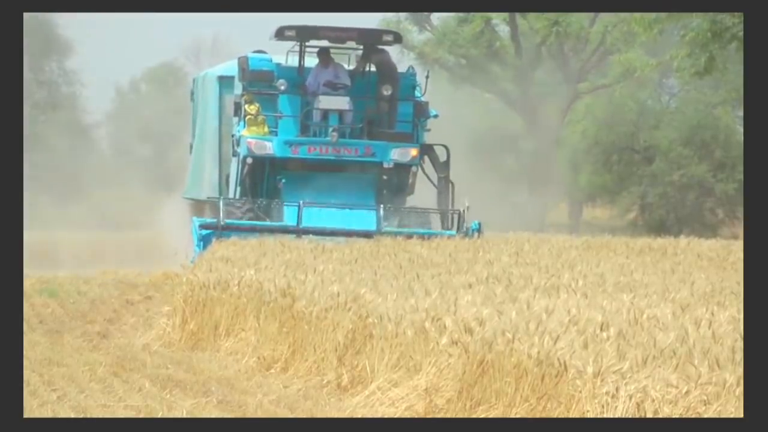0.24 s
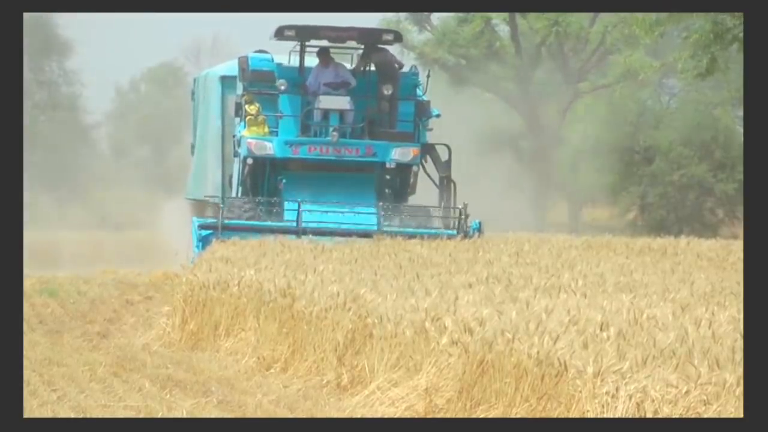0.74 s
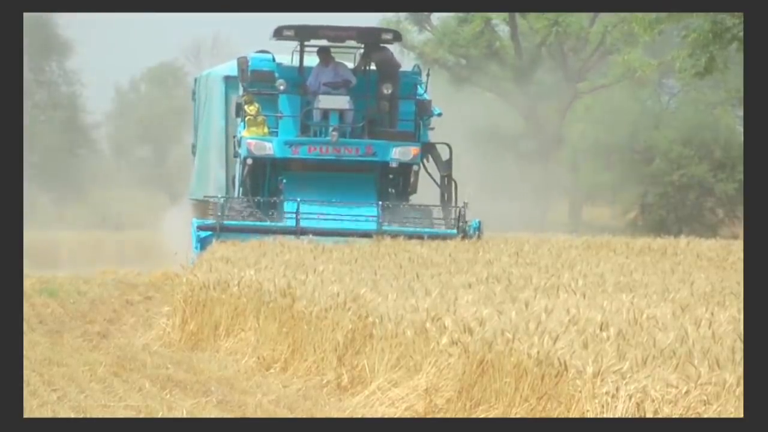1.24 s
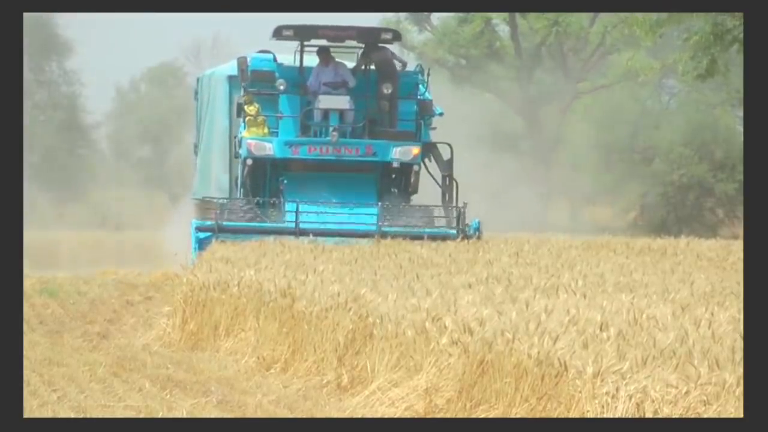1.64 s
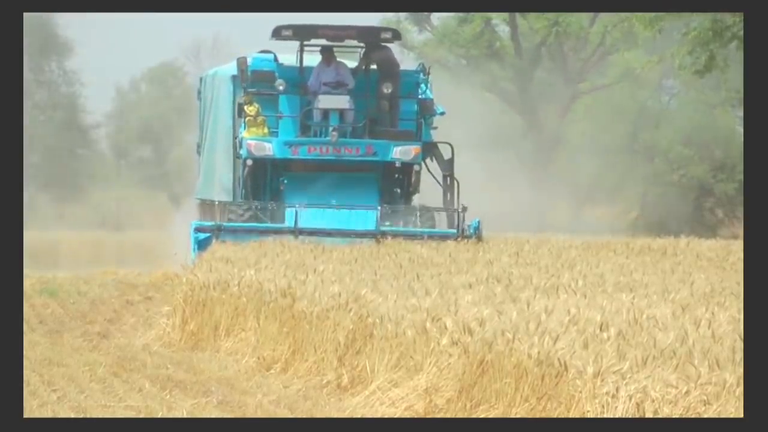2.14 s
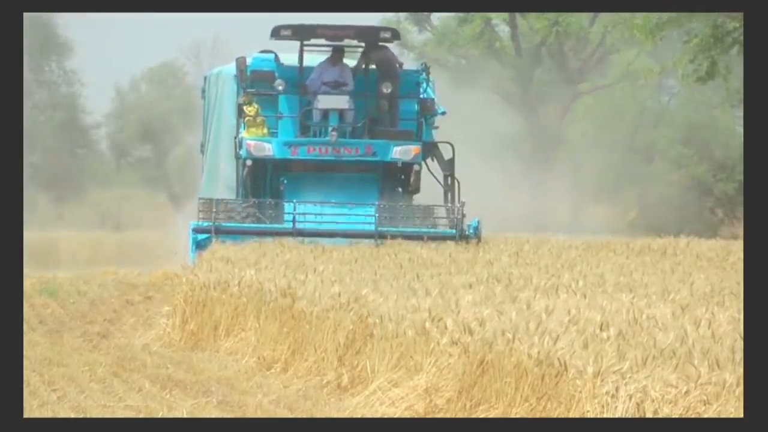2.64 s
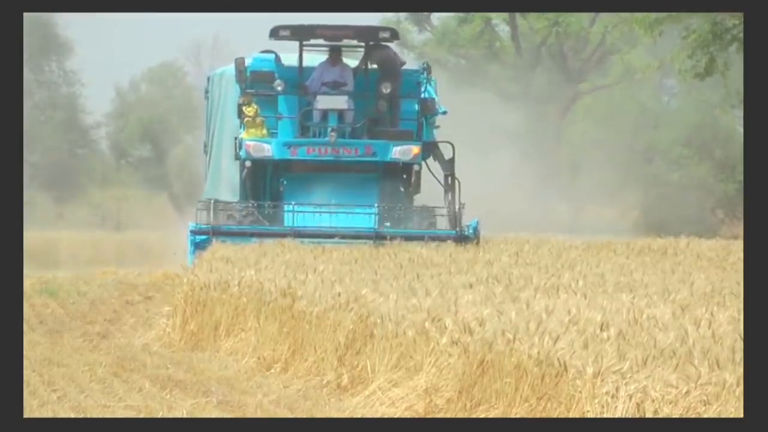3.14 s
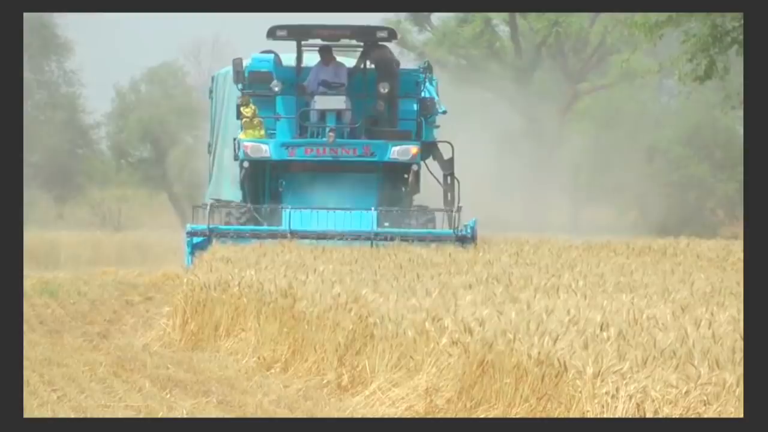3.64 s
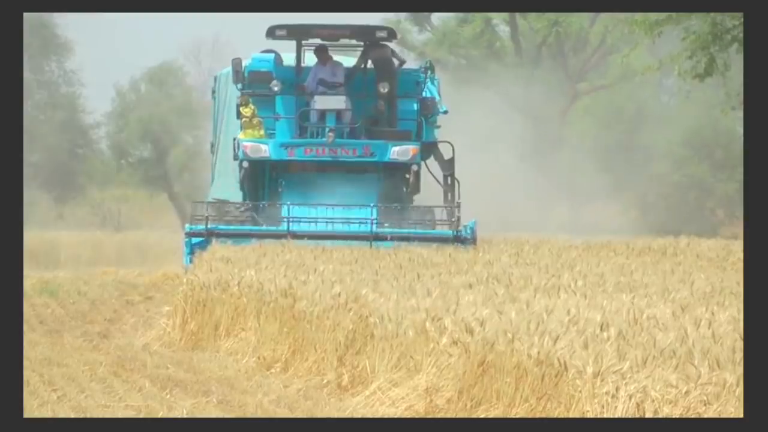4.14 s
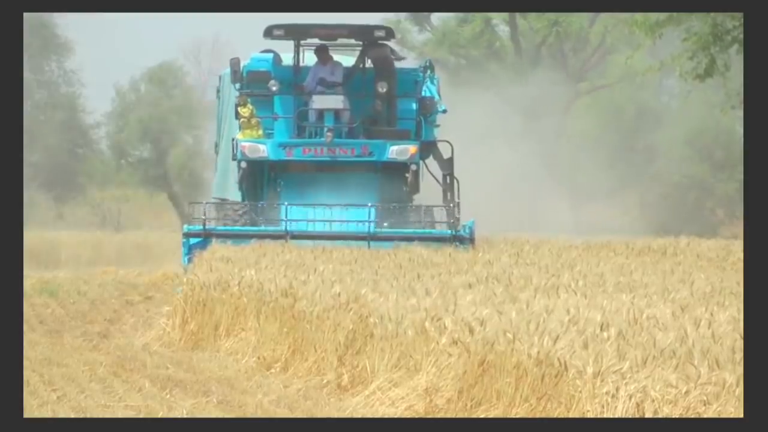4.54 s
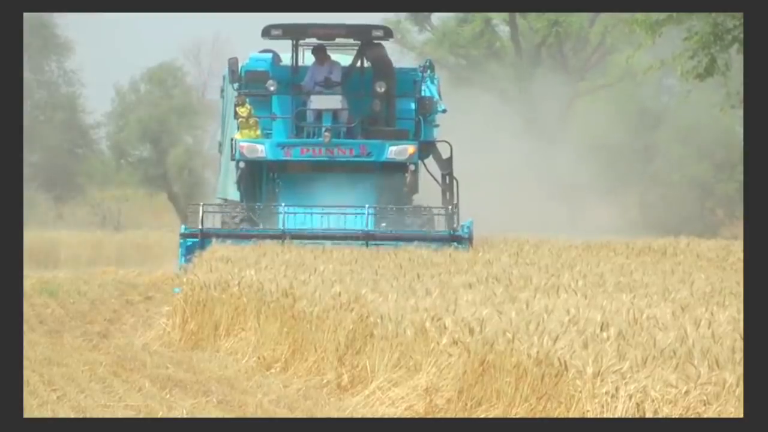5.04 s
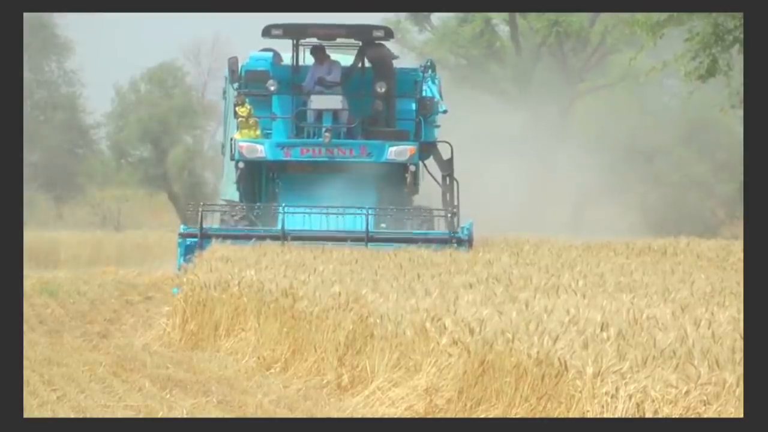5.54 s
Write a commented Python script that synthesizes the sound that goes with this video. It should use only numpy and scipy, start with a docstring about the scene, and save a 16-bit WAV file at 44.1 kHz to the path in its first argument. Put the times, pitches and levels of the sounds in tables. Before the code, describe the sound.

A combine harvester works some way off in an open field. A steady low diesel hum, booming sheet-metal panels and a grainy rush of threshing run throughout, the rush rising slightly. Over them the knife clatters at about 22 strokes a second, hard, ringing and metallic, skewed to the right, with brighter straw-shearing swells. It peaks in sharp clacks around 2.0 to 2.3 s, then falls away by 2.6 s, creeping back from about 3 s as fainter, irregular knocks. Tiny scratchy squeaks come near 2.7, 3.9 and 4.2 s. Wind thumps the microphone with dull, bassy bursts from 0.4 to 1.1 s, eases, returns from 3.4 s and pounds hardest after 4.4 s, with a violent burst near 4.5 s and another at 5.7 s; strong gusts briefly duck all the sound. A fine, wide, dry crop hiss grows toward the end at 5.8 s.

```python
"""A combine harvester cuts wheat some way off in an open field, its rush of threshing noise rising as it nears.
The knife, bursts of noise ringing bar resonances, clatters hard for two seconds, drops away, then creeps back.
Under it run the diesel's sine harmonics, booming panels and grainy threshing noise; from 2.7 s scratchy tones
squeak now and then. Wind, rumbling noise, buffets the microphone in the first second, eases, then returns
from 3.4 s, hardest after 4.4 s, while the high noise of the crop's hiss grows and strong gusts duck the level."""
import sys
import numpy as np
from scipy import signal
from scipy.fft import rfft, irfft
from scipy.io import wavfile
from scipy.ndimage import uniform_filter1d

SR = 44100
rng = np.random.default_rng(int(sys.argv[2]) if len(sys.argv) > 2 else 0)


def wav_record(signal):
    """Record a signal, one row per channel, as 16-bit PCM in the file named by sys.argv[1]."""
    frames = np.transpose(np.atleast_2d(signal))
    bounded = np.clip(frames, -1, 1)
    # unit amplitude maps onto the largest positive 16-bit level
    quanta = np.round(bounded * 32767).astype(np.int16)
    wavfile.write(sys.argv[1], SR, quanta)


N = 255339
TIME = np.arange(N) / SR
FREQS = np.fft.rfftfreq(N, 1 / SR)


def amp(db):
    """Decibels to gain."""
    return 10 ** (np.asarray(db) / 20)


def unit(x):
    """Scales to rms 1."""
    return x / np.sqrt(np.mean(x ** 2) + 1e-20)


def curve(rows, t=TIME):
    """Reads a table over time."""
    return np.interp(t, *np.transpose(rows))


def spectrum(rows, hz=FREQS):
    """Reads a table over log frequency."""
    f, value = np.transpose(rows)
    return np.interp(np.log(hz + 1), np.log(f + 1), value)


def colour(x, response):
    """Filters by a frequency response."""
    return irfft(rfft(x) * response, x.shape[-1])


def pan(db):
    """Left and right gains for a level difference."""
    return amp(np.array([db, -db]) / 2)


def drift(rate_hz):
    """Slow chance of rms 1: random points, two per cycle of the rate, joined by straight lines."""
    steps = TIME * rate_hz * 2
    return unit(np.interp(steps, np.arange(N), rng.standard_normal(N)))


def swell(t, half):
    """A smooth rise and fall of height 1 around t = 0."""
    return np.exp(-(t / half) ** 2 / 2)


def power(x, span):
    """Running power of both ears over about span seconds."""
    size = max(int(span * SR), 2)
    smoothed = uniform_filter1d(uniform_filter1d((x ** 2).mean(0), size), size)
    return abs(smoothed) + 1e-14


def noise_pair(likeness, size=N):
    """White noise at two ears, alike by the given share at each frequency."""
    a, b = rfft(rng.standard_normal((2, size)))
    same = np.clip(spectrum(likeness, np.fft.rfftfreq(size, 1 / SR)), -1, 1)
    other = same * a + np.sqrt(1 - same ** 2) * b
    return irfft(np.array([a, other]), size)


def add(mix, s, sound):
    """Mixes a sound in, centred on s seconds."""
    start = max(round(s * SR) - sound.shape[1] // 2, 0)
    part = mix[:, start:][:, :sound.shape[1]]
    part += sound[:, :part.shape[1]]


# Stereo widening, which pushes sound to the right and cuts a deep notch in the left ear:
# (frequency [Hz], left-right level [dB], left leads by [radians])
STEREO_WIDENING = [(400, 0, -.1), (900, -2, -.7), (1400, -5, -.7), (1950, -10, -1.05), (2150, -15, -1.2),
                   (2260, -24, -.6), (2350, -16, .6), (2550, -8.5, .45), (2900, -6, 0), (4300, -4.8, -.05),
                   (6000, -.5, 0), (15000, 0, 0)]


def widen(x, share):
    """Widens a sound towards the right by a share of that level and phase; both ears' sum keeps its colour."""
    hz, db, radians = np.transpose(STEREO_WIDENING)
    level = amp(share * spectrum(np.c_[hz, db]))
    ratio = level * np.exp(1j * share * spectrum(np.c_[hz, radians]))
    return colour(x, 2 * np.array([ratio, np.ones_like(ratio)]) / (1 + ratio))


# Knife drive: (time [s], speed [strokes/s])
KNIFE_DRIVE = [(0.0, 22.47), (0.6, 22.73), (1.0, 22.58), (1.5, 23.05), (2.0, 22.72), (2.5, 22.58),
               (3.0, 21.97), (3.4, 21.53), (3.9, 21.81), (4.4, 22.3), (4.7, 22.15), (5.0, 22.43),
               (5.3, 22.37), (5.8, 22.59)]
# Impacts at the two ears: (frequency [Hz], likeness [0-1])
KNIFE_LIKENESS = [(300, 0.6), (1400, 0.9), (2200, 0.95), (2700, 0.98), (6000, 0.98)]
# Ringing of the cutter bar: (frequency [Hz], width [Hz], relative level [dB])
BAR_RESONANCES = [(1136, 54, 0), (1449, 53, 8.5), (1793, 63, 6.5), (2123, 160, 5.5), (2450, 130, 2),
                  (2673, 120, 0.5), (2890, 44, 3), (3160, 106, 3), (3504, 70, -0.5), (3880, 87, -18),
                  (4500, 84, -20)]
# Dull part of each knock: (frequency [Hz], relative density [dB per Hz])
KNOCK_COLOUR = [(200, -20), (500, 2), (900, 6.5), (1200, 0), (1450, 15), (2400, 6.5), (3400, 3.5),
                (3900, -4.5), (4700, -7), (5050, -28), (5800, -18), (9000, -39)]


def knife(level_db=-9.5, lead=0.054, rise=0.0054, attack=0.00064, spread=0.0032, tap=0.39,
          rattle=0.39, rattle_decay=0.024, grain_db=2.2, knock_db=-8.5, hardening=0.59,
          echo=0.58, echo_s=0.00283, shear_db=-8, spot_db=4.0, count=4):
    """Each stroke throws loose sections on their guards: a light tap, then tight impacts that ring the bar."""
    strokes = np.cumsum(curve(KNIFE_DRIVE)) / SR + lead  # lead in strokes
    index = strokes.astype(int)
    starts = TIME[np.searchsorted(index, np.arange(index[-1] + 1))]
    age = TIME - starts[index]  # seconds into the stroke
    late = age - rise  # seconds past the main knock

    # the loose sections rattle on after the knock
    tail = rattle * np.clip(late / rise, 0, 1) * np.exp(-abs(late) / rattle_decay)
    light_tap = tap * swell(age - rise / 2, rise / 4)
    main_knock = swell(late, np.where(late < 0, attack, spread))
    blow = unit(light_tap + main_knock + tail)
    grain = unit(amp(grain_db * drift(585)))
    impacts = noise_pair(KNIFE_LIKENESS) * blow * grain

    modes = np.array([amp(db) / (1 + 2j * (FREQS - hz) / width) for hz, width, db in BAR_RESONANCES])
    modes /= 1 + (FREQS / 5000) ** 10  # the crop and the air take the ring's top off
    modes /= np.sqrt(np.mean(np.sum(abs(modes) ** 2, axis=0)))
    # each stroke lands on another spot of the bar and favours other modes, in count groups
    spots = amp(spot_db * rng.standard_normal((len(starts), count)))
    spots *= rng.choice([-1, 1], (len(starts), count))
    metal = sum(colour(impacts * spots[index, k], modes[k::count].sum(0)) for k in range(count))

    # the further a clack stands above the steady knocking, the more it cracks rather than rings
    steady_db, force_db = stroke_levels(starts + rise)
    crack = amp(knock_db + hardening * (force_db - steady_db))[index]
    # the knock reflects off the sheet metal behind the knife
    hollow = 1 + echo * np.exp(-2j * np.pi * FREQS * echo_s)
    dull_noise = noise_pair(KNIFE_LIKENESS) * unit(blow ** 1.18)
    metal += crack * colour(dull_noise, unit(amp(spectrum(KNOCK_COLOUR))) * hollow)

    # the energy of a stroke's metal is set by its force alone, wherever it lands
    metal_energy = np.bincount(index, (metal ** 2).mean(0))
    blow_energy = np.bincount(index, blow ** 2)
    metal /= np.sqrt(metal_energy / (blow_energy + 1e-9) + 1e-9)[index]
    force = amp(force_db + level_db)[index]
    straw = amp(shear_db) * shearing(impacts, starts[index] + rise)
    return widen(force * metal + straw, 0.92)


# Steady knocking, dying away after two seconds and creeping back, before the knife's overall gain:
# (time [s], level [dB])
STEADY_KNOCKING = [(0, -43.5), (.35, -41), (.5, -43.5), (.65, -40.5), (.8, -43.5), (1.0, -40), (1.3, -38.5),
                   (1.55, -37), (1.88, -42.5), (2.0, -36), (2.1, -57.5), (3.15, -56), (3.4, -50),
                   (3.75, -49.5), (3.93, -45.5), (4.45, -44.5), (4.56, -49), (4.72, -47.5), (5.8, -49.5)]
# Single strokes that clack hard, before the same gain: (time [s], level [dB])
HARD_CLACKS = [(0.095, -39.5), (0.184, -39.5), (0.317, -38.5), (0.493, -40), (0.58, -38), (0.625, -38),
               (1.637, -37), (1.678, -38), (1.81, -38), (1.985, -37), (2.03, -33.5), (2.073, -36),
               (2.252, -43.5), (2.297, -34), (2.34, -32.5), (2.517, -42.5), (2.56, -39), (2.603, -42.5),
               (3.01, -46), (3.055, -46.5), (3.654, -47), (3.7, -46.5), (4.022, -46), (4.34, -42),
               (4.385, -42), (4.474, -45), (4.745, -42.5), (4.88, -47), (4.924, -43), (5.013, -46),
               (5.102, -44), (5.415, -44.5), (5.459, -44.5), (5.55, -46), (5.59, -43.5), (5.635, -46)]


def stroke_levels(times, scatter_db=0.7):
    """Steady and full knock of each stroke in dB: chance scatters them, a clack takes over the nearest stroke."""
    steady_db = curve(STEADY_KNOCKING, times) + scatter_db * rng.standard_normal(len(times))
    knock_db = steady_db.copy()
    for s, db in HARD_CLACKS:
        knock_db[np.argmin(abs(times - s))] = db
    return steady_db, knock_db


# Shearing of straw: (frequency [Hz] at pitch 1, relative density [dB per Hz])
STRAW_COLOUR = [(1500, -25), (3400, 3), (4600, 5), (5200, -10), (8000, -27), (16000, -42)]
# Brighter shearing noise on the strokes, in short bursts and long swells, before the shearing gain:
# (time at the peak [s], level [dB], half length [s], pitch [factor on the straw's frequencies])
SHEAR_SWELLS = [(0.25, -47, 0.18, 0.77), (0.599, -64, 0.12, 1.4), (0.904, -50, 0.15, 0.75),
                (1.3, -54, 0.41, 0.89), (1.26, -60, 0.15, 1.44), (1.29, -51.5, 0.028, 1.2),
                (1.55, -63, 0.07, 1.35), (2.03, -38, 0.04, 0.66), (2.298, -40, 0.03, 0.7),
                (3.96, -52, 0.059, 0.81), (4.41, -53, 0.045, 1), (4.693, -53, .02, .95),
                (4.905, -48, 0.026, 0.98), (5.3, -57, 0.18, 0.94)]


def shearing(impacts, stroke_times):
    """Shearing adds brighter noise to the strokes in short bursts and long swells, each at its own pitch."""
    out = 0
    for s, db, half, pitch in SHEAR_SWELLS:
        noise = colour(impacts, unit(amp(spectrum(STRAW_COLOUR, FREQS / pitch))))
        out = out + amp(db) * swell(stroke_times - s, half) * noise
    return out


# Diesel harmonics: (multiple of the firing rate, level [dB rms])
ENGINE_HARMONICS = [(1, -79), (2, -48.5), (3, -55), (4, -70.5), (5, -61), (6, -71.5), (10, -68),
                    (12, -73.5)]


def engine(firing_hz=124.5, wander=0.00127, flutter_db=2.5, ear_lag=.0001):
    """Harmonics of the firing rate, held near-steady by the governor; moving air makes each one waver."""
    turns = np.cumsum(firing_hz * (1 + wander * drift(1.968))) / SR
    turns = turns + firing_hz * np.array([[0], [ear_lag]])  # right ear shifted by ear_lag seconds
    out = np.zeros((2, N))
    for multiple, db in ENGINE_HARMONICS:
        phase = 2 * np.pi * (round(multiple) * turns + rng.random())
        out += amp(db) * unit(np.sin(phase) * amp(flutter_db * drift(2.3)))
    return out


# Machine sound at the two ears: (frequency [Hz], likeness [0-1, clipped above 1])
MACHINE_LIKENESS = [(400, 1.5), (800, 0.78), (1500, 0.3), (2200, 0.8), (2700, 0.7), (4300, 0.75),
                    (6000, 1.2)]
# Booming panels of the threshing body: (frequency [Hz], width [Hz], level before the gain below [dB rms])
BODY_PANELS = [(98.3, 25, -42), (143.2, 14, -41.5), (205.6, 38.5, -39), (263.6, 31, -47), (404, 59, -56.5)]
# How strongly the panels come through: (time [s], gain [dB])
PANEL_GAIN = [(0, 1), (.8, -2.2), (1.4, 1.5), (1.85, -2), (2.02, 4.5), (2.2, 1), (2.9, 1.5), (3.5, 0.3),
              (5.8, -0.4)]


def panels(throb_db=0.5):
    """The shaking threshing gear sets the body's sheet metal booming: noise through broad resonances."""
    boom = sum(amp(db) * unit(1 / (1 + (2 * (FREQS - hz) / width) ** 2)) for hz, width, db in BODY_PANELS)
    return colour(noise_pair(MACHINE_LIKENESS), boom) * amp(curve(PANEL_GAIN) + throb_db * drift(11))


# Threshing drum, fan and sieves: (frequency [Hz], relative density [dB per Hz])
THRESHER_COLOUR = [(50, 11.5), (80, 3), (150, -18), (300, 9), (520, 2.5), (640, -4), (780, -3), (900, -9.5),
                   (1090, -7.5), (1170, -10.5), (1450, -11.5), (1620, -13.5), (2380, -14.5), (2560, -13),
                   (2700, -13.5), (3000, -14), (3500, -16.5), (5300, -24), (7500, -32.5), (15000, -51)]
# Their balance before widening: (frequency [Hz], left-right level [dB])
THRESHER_BALANCE = [(100, -1.2), (700, 1.5), (1100, 0.5), (1600, 1.5), (3000, 0.5), (5000, 0), (15000, 0)]
# Their loudness: (time [s], level [dB rms])
THRESHER_LEVEL = [(0, -43.5), (1.5, -42.5), (5.8, -41.5)]


def thresher(flutter_db=0.8, grain_db=0.3, width=0.25):
    """Rush of drum, fan and straw, grainy with kernels striking the sheet metal."""
    grains = noise_pair(MACHINE_LIKENESS) * amp(flutter_db * drift(37.1) + grain_db * drift(360))
    rush = colour(grains, amp(spectrum(THRESHER_COLOUR)) * pan(spectrum(THRESHER_BALANCE)))
    return unit(widen(rush, width)) * amp(curve(THRESHER_LEVEL))


# Scratchy tones, two gliding and two faint ones held at one pitch:
# (start [s], length [s], start pitch [Hz], end pitch [Hz], peak level [dB rms], roughness [0-1])
SCRATCHY_SQUEAKS = [(2.728, .034, 4550, 4950, -55.5, .65), (2.78, .042, 2650, 2450, -51.5, .7),
                    (3.87, .12, 3250, 3250, -58, .5), (4.19, .1, 2480, 2480, -54.5, .5)]


def squeaks():
    """Brief tones, gliding or held at one pitch, scratchy because their pitch jitters fast."""
    out = np.zeros(N)
    for s, length, start_hz, end_hz, db, rough in SCRATCHY_SQUEAKS:
        u = np.clip((TIME - s) / length, 0, 1)
        pitch_hz = start_hz + (end_hz - start_hz) * u
        hz = pitch_hz * (1 + 0.082 * rough * drift(580))
        tone = np.sin(2 * np.pi * np.cumsum(hz) / SR)
        out += amp(db) * np.sqrt(2) * np.sin(np.pi * u) * tone
    return out


# Wind rumble between buffets, before its lumps: (time [s], level [dB])
WIND_LEVEL = [(0, -31), (.15, -36.5), (.35, -43), (.5, -33.5), (.9, -31.5), (1.3, -35.5), (1.8, -44.5),
              (2.03, -39), (2.5, -41), (2.85, -38), (3.2, -44), (3.65, -32), (4.05, -31), (4.22, -33.5),
              (4.42, -26), (4.92, -29), (5.3, -29), (5.8, -29)]
# The strongest buffets:
# (time at the peak [s], level [dB], half length [s], brightness [factor on the wind's upper frequencies])
WIND_BUFFETS = [(0.385, -16.5, 0.0028, 0.61), (0.42, -20.5, 0.0025, 0.68), (0.486, -25, 0.012, 0.81),
                (0.618, -25, 0.012, 1.1), (0.719, -27.5, 0.0083, 1.14), (0.745, -24, 0.0087, 0.46),
                (0.849, -25.5, 0.0061, 1.65), (0.93, -26.5, 0.0052, 1.4), (1.026, -19.5, 0.0096, 0.63),
                (1.089, -17, 0.0036, 0.69), (2.11, -30.5, 0.023, 0.66), (3.428, -25.5, 0.007, 0.9),
                (3.558, -28, 0.0076, 0.33), (3.6, -27, 0.0076, 1.5), (3.648, -24, 0.016, 0.46),
                (3.732, -19.5, 0.01, 0.5), (3.779, -23, 0.0056, 0.35), (3.953, -22.5, 0.0053, 0.92),
                (4.018, -23, 0.016, 1.4), (4.061, -22, 0.012, 0.81), (4.085, -22, 0.0052, 1.5),
                (4.364, -22.5, 0.0096, 0.91), (4.41, -16, 0.0038, 0.95), (4.438, -22.5, 0.0052, 1.5),
                (4.473, -13.5, 0.0045, 1.25), (4.487, -11, 0.004, 2.75), (4.499, -11.5, 0.0048, 2.1),
                (4.511, -12.5, 0.0045, 1.1), (4.512, -21, 0.009, 2.5), (4.608, -14, 0.017, 0.87),
                (4.682, -16.5, 0.011, 0.85), (4.769, -22.5, 0.0091, 0.58), (4.849, -20, 0.012, 0.97),
                (4.941, -15, 0.01, 0.83), (5.048, -22, 0.022, 1.08), (5.121, -18.5, 0.012, 0.99),
                (5.216, -24.5, 0.0055, 0.81), (5.294, -17, 0.0054, 0.79), (5.367, -21.5, 0.0095, 0.73),
                (5.402, -22, 0.013, 1.15), (5.52, -16, 0.01, 0.85), (5.613, -20, 0.009, 0.45),
                (5.663, -17, .011, 1.03), (5.733, -8.5, 0.0038, 0.71), (5.775, -18.5, 0.014, 1.15)]


def wind(lump_db=2, buffet_low_hz=100, size=8192):
    """A lumpy rumble out of which separate buffets stand."""
    out = eddies(0.98, 25, 0.04, size=N) * amp(curve(WIND_LEVEL) + lump_db * drift(25))
    t = (np.arange(size) - size / 2) / SR
    for s, db, half, brightness in WIND_BUFFETS:
        swirl = eddies(brightness, buffet_low_hz, .011, size=size)
        add(out, s, swirl * amp(db) * swell(t, half))
    return out


# Turbulence at brightness 1: (frequency [Hz], relative density [dB per Hz])
WIND_COLOUR = [(15, -38), (30, -5.5), (50, -4.5), (75, -4), (100, 1.5), (145, 3.5), (210, -2.5), (275, -12),
               (340, -15), (500, -23.5), (700, -32.5), (1100, -56), (2500, -89)]
# Turbulence at the two ears: (frequency [Hz], likeness [-1 to 1])
WIND_LIKENESS = [(50, 0.9), (110, 0.98), (220, 0.92), (330, 0.87), (480, -0.21), (900, -0.7)]
# Its balance: (frequency [Hz], left-right level [dB])
WIND_BALANCE = [(100, -0.5), (300, 0.3), (500, 4.5), (900, 5)]


def eddies(brightness, low_hz, span, size):
    """Turbulence at the microphone ports, evened over span seconds; small eddies hold little below low_hz."""
    hz = np.fft.rfftfreq(size, 1 / SR)
    # faster eddies shift the rumble up, its top most of all
    stretch = brightness ** np.clip(np.log2((hz + 1) / 150) / 1.4, .6, 1)
    small = 1 / np.sqrt(1 + (low_hz * stretch / (hz + 1)) ** 6)
    response = small * amp(spectrum(WIND_COLOUR, hz / stretch)) * pan(spectrum(WIND_BALANCE, hz))
    x = colour(noise_pair(WIND_LIKENESS, size=size), response)
    return x / np.sqrt(power(x, span))


# Fine hiss of the crop: (frequency [Hz], relative density [dB per Hz])
HISS_COLOUR = [(2000, 2.5), (5000, -6), (7500, 0), (10000, 2), (12500, 1.5), (15000, -0.5), (16000, -9)]
# Hiss at the two ears: (frequency [Hz], likeness [-1 to 1])
HISS_LIKENESS = [(4000, 1), (7000, 0.94), (8300, 0.35), (10000, 0.055), (13000, -0.31)]
# Its loudness before flutter: (time [s], level [dB])
HISS_LEVEL = [(0, -65), (2.2, -64), (4.7, -62), (5.8, -58.5)]


def crop(flutter_db=1.0):
    """Dry ears of wheat hiss as the breeze picks up: high noise with a light flutter."""
    hiss = unit(colour(noise_pair(HISS_LIKENESS), amp(spectrum(HISS_COLOUR))))
    return hiss * amp(curve(HISS_LEVEL) + flutter_db * drift(20))


def scene():
    """The harvester, the wind and the field."""
    return knife() + engine() + panels() + thresher() + squeaks() + wind() + crop()


def record(dry, low_cut_hz=54, threshold_db=-17, slope=0.76, recovery_db=14, edge_hz=15400):
    """The microphone's low cut, gain control that ducks everything under strong buffets, and the band limit."""
    dry = signal.sosfilt(signal.butter(3, low_cut_hz, "highpass", fs=SR, output="sos"), dry)
    # the held level falls back by recovery_db a second
    fall = TIME * recovery_db
    held_db = np.maximum.accumulate(10 * np.log10(power(dry, 0.016)) + fall) - fall
    ducked = dry * amp(-slope * np.maximum(held_db - threshold_db, 0))
    band_limit = signal.firwin(511, edge_hz, window=("kaiser", 9), fs=SR)
    return signal.oaconvolve(ducked, band_limit[None], "same")


dry = scene()
out = record(dry)
wav_record(out)
```